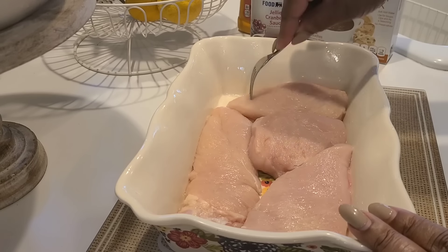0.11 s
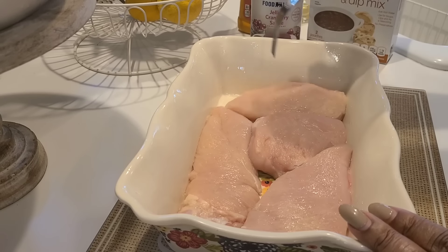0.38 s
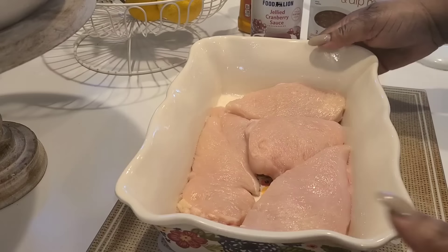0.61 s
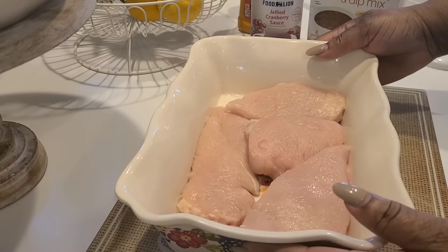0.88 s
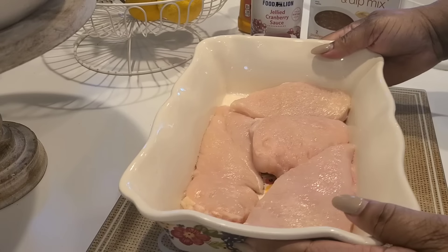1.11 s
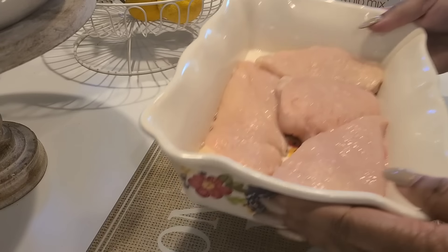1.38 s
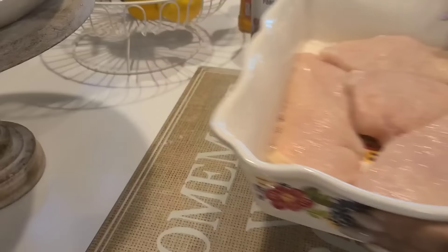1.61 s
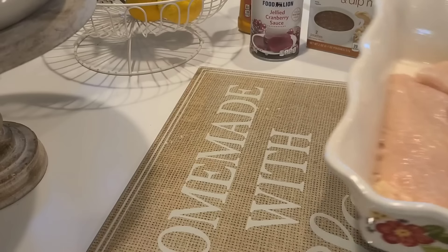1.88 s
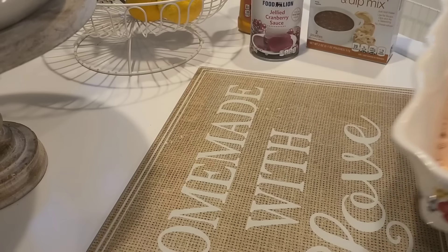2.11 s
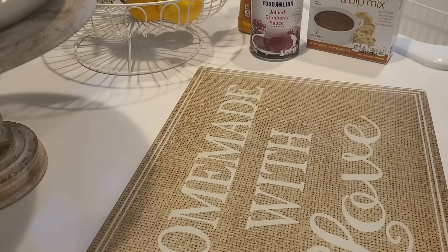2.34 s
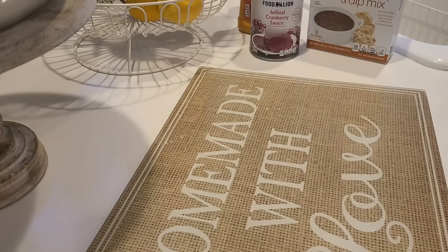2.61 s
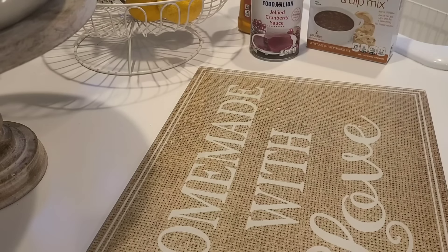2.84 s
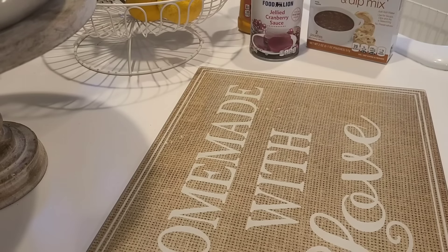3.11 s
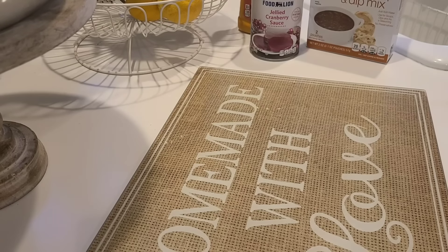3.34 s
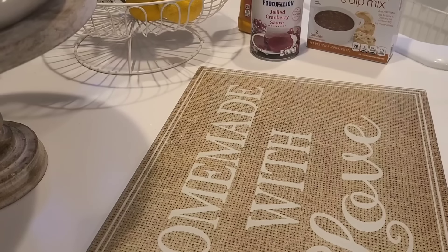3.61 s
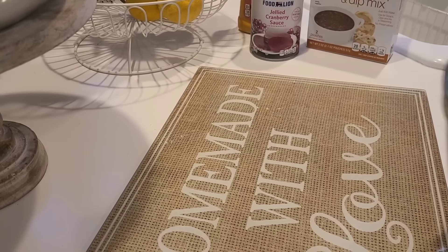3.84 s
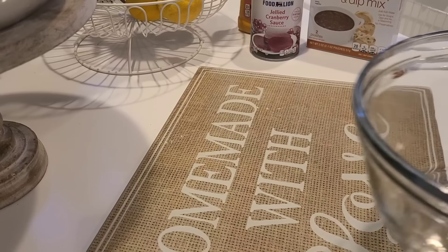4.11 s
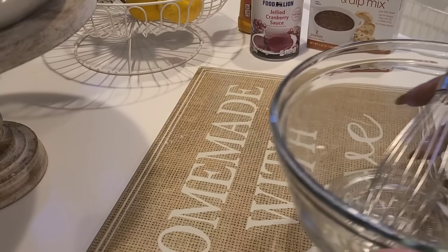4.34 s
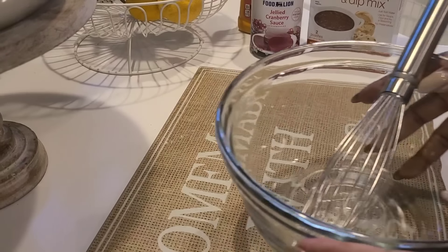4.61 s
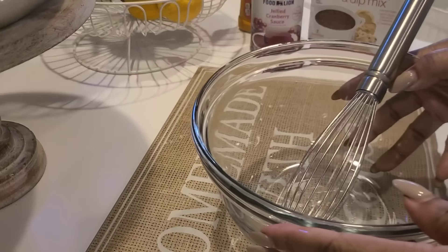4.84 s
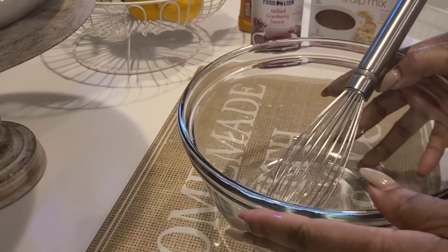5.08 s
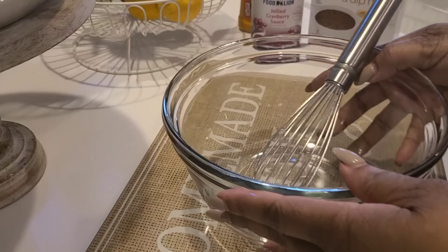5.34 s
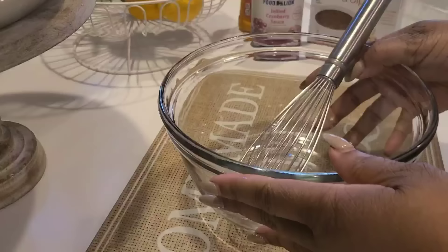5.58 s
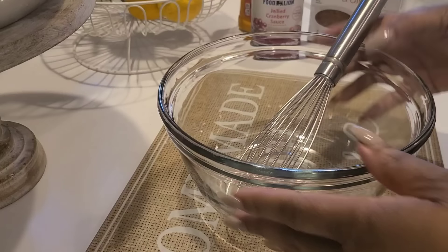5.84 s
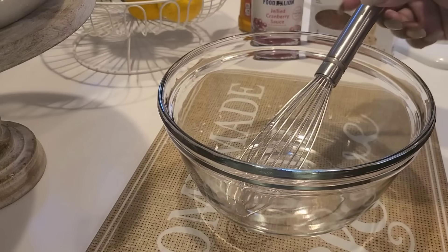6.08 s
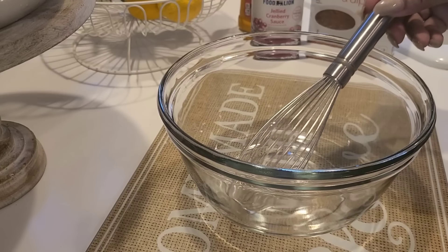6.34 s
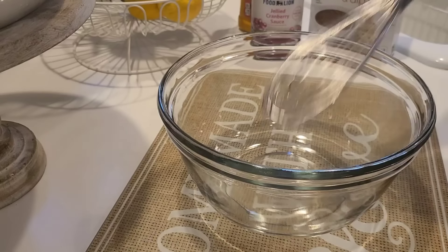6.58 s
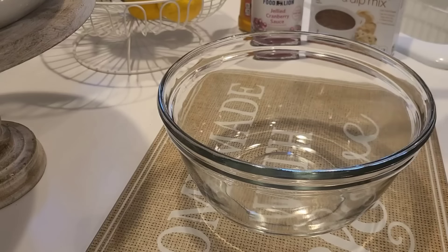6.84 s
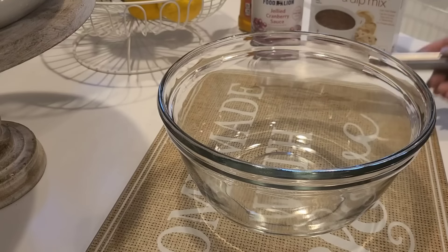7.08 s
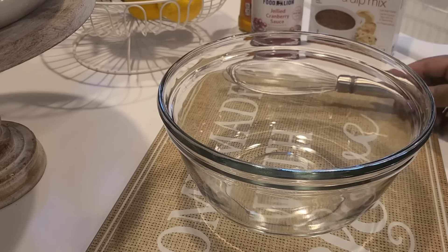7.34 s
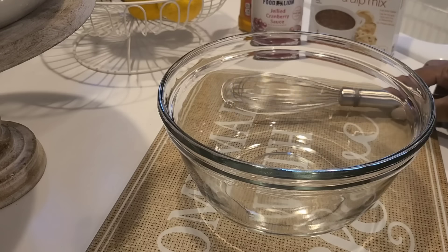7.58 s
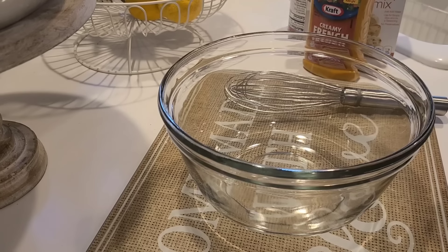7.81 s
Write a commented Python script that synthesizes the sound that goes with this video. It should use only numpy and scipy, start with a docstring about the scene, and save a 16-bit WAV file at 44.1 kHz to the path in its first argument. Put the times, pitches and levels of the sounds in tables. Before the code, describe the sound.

Close stereo kitchen sounds over a faint low hum and thin treble hiss: a cluster of ceramic knocks, an instant of dropout, tiny clinks, then mostly quiet. Small glassy taps and metal ticks lead to a heavy bowl set-down and a second abrupt knock, each with a short room tail. A softer glass tap follows, then whisk wires rattle on the counter in several bright bursts with one last hard clack.

```python
"""Knocks of a fork and a ceramic dish on a kitchen counter, taps on a glass bowl, then a clatter of whisk wires.
Shaped noise bursts make the knocks and low thumps; decaying tones make glass, dish and wires ring, and the
room answers with a noise tail. Steady tones and noise make a refrigerator hum; a treble hiss swells and fades.
The close sounds fall silent abruptly during two spans, and once everything drops out for an instant."""
import sys
import numpy as np
from scipy import signal
from scipy.fft import rfft, irfft, next_fast_len
from scipy.io import wavfile
from scipy.ndimage import uniform_filter1d, map_coordinates

SR = 44100
rng = np.random.default_rng(int(sys.argv[2]) if len(sys.argv) > 2 else 0)


def to_wav(s):
    """Save 16-bit WAV."""
    ch = np.atleast_2d(s).T  # columns
    pcm = np.round(np.clip(ch, -1, 1) * 32767)  # PCM
    wavfile.write(sys.argv[1], SR, pcm.astype(np.int16))


def volts(x):
    """Linear amplitude factor 10**(x/20) for a level x in dB, scalar or array-like."""
    e = np.asarray(x, float) / 20
    return 10 ** e


N = 350595  # length of the scene [samples]
SIZE = 16384  # longest single sound, before the room answers [samples]
# how alike the left and right noise are: (frequency [Hz], likeness [-1 to 1])
LIKENESS = [(60, 1), (180, 0.66), (550, 0.52), (1650, -0.087), (4970, -0.068), (15000, 0.81)]


def knocks():
    """Hard things meet: short bursts of contact noise ring the dish and the counter."""
    # knocks: (time [s], peak level [dB], hardness [dB per octave], ringing pitch [Hz])
    knock_list = [(0.004, -31.5, -1, 2170), (0.066, -31, 3.5, 2850), (0.282, -37, -0.5, 1500),
                  (0.289, -13, -1, 650), (0.293, -19, 0, 3050), (0.309, -13, -4.5, 2450),
                  (0.312, -14.5, -1.5, 1160), (0.433, -40.5, 5, 4370), (0.452, -41, 3, 4200),
                  (0.477, -58, 4, 2000), (0.791, -37.5, 13.5, 6100), (0.959, -31, 9, 4550),
                  (1.052, -43.5, 8.5, 6340), (1.21, -39, 8, 5040), (2.164, -23.5, 1.5, 2800),
                  (2.177, -20, 0.5, 3460), (3.082, -29, -7.5, 1550), (3.125, -39.5, -14.5, 970),
                  (3.47, -27, -7.5, 720), (3.495, -40.5, -8, 2000), (4.364, -34, 2, 1670),
                  (4.5, -34, 15.5, 6600), (5.096, -28, 2.5, 4000), (5.106, -1.5, 0, 1970),
                  (5.11, -6.5, 1, 4270), (5.118, -4.5, -0.5, 1040), (5.131, -11.5, -5.5, 634),
                  (5.144, -13.5, -1, 2000), (5.158, -14.5, -1, 1020), (5.176, -14, -2.5, 1144),
                  (5.198, -22.5, 0, 1970), (5.591, -35, 2.5, 3000), (5.6, -2.5, -1.5, 2040),
                  (5.639, -24.5, -5.5, 990), (5.864, -28, 7.5, 2270), (6.093, -41, -0.5, 2100),
                  (6.271, -20.5, 0, 2170), (6.301, -34.5, 0, 3600), (7.481, -13, 4.5, 4230),
                  (7.564, -27, -2.5, 630), (7.757, -19.5, 1.5, 660), (7.934, 0.5, 5, 1950)]
    # one brief drag: (from [s], to [s], level [dB], hardness [dB per octave]);
    # the silence at 3.536 s ends it sooner
    scuff = (3.5, 6.5, -54, 12)
    rise_s, soft_t60_s = 0.00027, 0.07  # the ring time is for hardness 0
    shorter_per_db = 0.1549  # hard knocks die sooner
    spike = 1.2  # strength of the first contact beside the noise
    out = np.zeros((2, N + SIZE))
    for s, db, hardness_db, ring_hz in knock_list:
        t60 = soft_t60_s * np.exp(-shorter_per_db * hardness_db)
        first_contact = spike * fading(0.0045, rise_s)
        contact = crunch() * fading(t60, rise_s) + first_contact
        spectra = stereo(contact, least_alike=0.35) * clack(hardness_db, ring_hz)
        add(out, s, volts(db) * peak(irfft(spectra)), left_db=-1.0)
    start, end, db, hardness_db = scuff
    held = np.arange(SIZE) < (end - start) * SR
    drag = irfft(stereo(held) * clack(hardness_db, 2170))
    add(out, start, volts(db) * drag / drag[:, held].std(), left_db=-1.2)
    return out


def crunch():
    """A knock is a cluster of tiny contacts: each gets its own random loudness."""
    spacing_s, spread_db = 0.002, 4.5
    step = round(spacing_s * SR)
    sizes = volts(spread_db * rng.standard_normal(SIZE // step + 1))
    return np.repeat(sizes, step)[:SIZE]


def clack(hardness_db, ring_hz):
    """The counter's colour, tilted by the hardness of the contact, with one ring and many small random ones."""
    # colour of dish and counter: (frequency [Hz], relative level [dB])
    colour = [(35, -48.5), (100, -19.5), (350, -8), (1150, -0.5), (2000, -3), (3600, -8), (4500, -13),
              (6400, -16.5), (9200, -29), (16000, -41)]
    hz = np.fft.rfftfreq(SIZE, 1 / SR)
    lumps_db = 3 * unit(uniform_filter1d(rng.standard_normal(len(hz)), size=170))
    ring_db = 6.5 / (1 + ((hz - ring_hz) / (.08 * ring_hz)) ** 2)
    tilt_db = hardness_db * np.log2((hz + 100) / 2000)
    return causal(along(colour, hz) + tilt_db + lumps_db + ring_db)


def whisk():
    """Each drop rings the main wires, three loud and free and the rest damped, many lesser ones and a clash."""
    # drops on the counter: (time [s], level [dB], three best struck pitches [Hz, Hz, Hz], rattle length [s])
    rattles = [(7.305, -4.5, 2794, 7990, 1290, 0.035), (7.345, -17, 2132, 4720, 895, 0.028),
               (7.357, -12.5, 3787, 6930, 2960, 0.0255), (7.564, -7.5, 5060, 3055, 2260, 0.052),
               (7.685, -18.5, 5505, 5930, 4457, 0.022), (7.709, -18.5, 3468, 4930, 1200, 0.05),
               (7.757, -7.5, 3787, 4457, 2500, 0.035), (7.78, -15.5, 2062, 1626, 5265, 0.041),
               (7.92, -15.5, 3787, 5930, 8100, 0.048)]
    # tones of the wires: (pitch [Hz], relative level [dB], ring time when free [s])
    wire_modes = [(745, -29, .3), (895, -24, .4), (975, -23, .4), (1200, -25, .3), (1290, -12, .08),
                  (1550, -17, .25), (1626, -14, .15), (2062, -13, .7), (2132, -13, .7), (2260, -8, .07),
                  (2500, -11, .07), (2794, -15, .55), (2960, -12, .15), (3055, -12, .22), (3468, -11, .12),
                  (3787, -12, .26), (4457, -11, .12), (4720, -13, .55), (4930, -13, .15), (5060, -8, .14),
                  (5265, -10, .13), (5505, -11, .15), (5930, -9, .15), (6170, -12, .2), (6490, -9, .13),
                  (6930, -7, .2), (7370, -8, .22), (7990, -12, .28), (8100, -9, .15), (8660, -11, .18),
                  (10870, -11, .12), (11950, -6, .14)]
    # colour of wire striking wire: (frequency [Hz], relative level [dB])
    clash_colour = [(240, -38), (550, -27), (1900, -14.5), (2840, -7.5), (4730, -7), (5110, -3),
                    (6540, -7.5), (14800, -12), (16000, -16)]
    damped = .28  # share of its ring time left to a wire that lands on the counter
    ring_db, jangle_db, clash_db = -3.0, -1.5, -13  # the mix of the three parts
    hz = np.fft.rfftfreq(SIZE, 1 / SR)
    out = np.zeros((2, N + SIZE))
    for s, db, *best_hz, length in rattles:
        favoured = lambda f: sum(favour(best, extra_db=11)(f) for best in best_hz)
        wires = np.array(wire_modes)
        wires[:, 2] *= np.where(favoured(wires[:, 0]) > 0, 1, damped)
        ring = struck(wires, favoured, length, scatter_db=1.5)
        # a new crowd of 120 lesser tones for every drop
        lesser_hz = 600 * 26 ** (rng.random(120) ** .7)
        lesser_t60 = 0.075 * (lesser_hz / 4000) ** -.1
        crowd = np.transpose([lesser_hz, along(clash_colour, lesser_hz), lesser_t60])
        jangle = struck(crowd, lambda f: 0, length, scatter_db=4.5)
        clash = irfft(stereo(fading(5 * length, 0.031)) * causal(along(clash_colour, hz)))
        clatter = volts(ring_db) * ring + volts(jangle_db) * jangle + volts(clash_db) * peak(clash)
        add(out, s - .002, volts(db) * clatter, left_db=-2.5)
    return out


def bowl():
    """Wires bounce softly on the glass and the handle ticks on the rim: few rings; knocks() cracks some taps."""
    # taps on the glass: (time [s], peak level [dB], best struck pitch [Hz], spread [octaves])
    taps = [(4.332, -45, 1430, 0.92), (4.357, -26.5, 1390, 1.06), (4.398, -28.5, 910, 0.54),
            (4.414, -32, 1480, 0.45), (4.47, -45, 895, 0.35), (4.497, -34, 5300, 0.47),
            (4.508, -36, 3200, 1), (4.58, -42, 1460, 0.57), (6.289, -26, 1930, 0.7),
            (6.34, -45.5, 2340, 0.2)]
    # tones of the glass: (pitch [Hz], relative level [dB], own ring time [s])
    glass = [(463, -3, .35), (915, -1, .11), (1435, -3, .12), (1890, -20, .08), (2395, -5, .14),
             (3620, 0, .09), (5120, -15, .04), (5850, -12, .05), (6200, -8, .04), (6420, -3, .05),
             (6560, 1, .07), (6720, -3, .05), (6880, -5, .09)]
    # handle on the rim: (time [s], peak level [dB], best struck pitch [Hz], left over right [dB])
    ticks = [(4.227, -33.5, 7090, -9.5), (4.816, -47, 3760, 2), (4.835, -46.5, 3760, -7),
             (4.856, -46, 3760, -14), (6.054, -44.5, 3760, -4.5), (6.152, -35, 3760, -2)]
    # tones of the handle: (pitch [Hz], relative level [dB], own ring time [s])
    handle = [(3760, -19, .06), (5830, -15, .05), (6870, -12, .04), (7090, -7, .04), (8820, -9, .06),
              (10090, -15, .04), (10900, -8, .07), (11900, -13, .05), (12950, -9, .06)]
    out = np.zeros((2, N + SIZE))
    # knocks() adds a small crack to some of the taps
    for s, db, hz, spread in taps:
        tap = struck(glass, near(hz, spread), length=.034, scatter_db=2)
        add(out, s - .002, volts(db) * tap, left_db=-1.5)
    for s, db, hz, left_db in ticks:
        tick = struck(handle, favour(hz, extra_db=19), length=.006, scatter_db=2.5)
        add(out, s - .001, volts(db) * tick, left_db)
    return out


def dish():
    """Fingernails clink on the ceramic: small hard touches ring it, mostly near the best struck pitch."""
    # touches: (time [s], peak level [dB], best struck pitch [Hz])
    clinks = [(1.209, -41, 5000), (1.224, -39.5, 3380), (1.28, -42, 1010)]
    # tones of the dish: (pitch [Hz], relative level [dB], own ring time [s])
    ceramic = [(1050, -10, .08), (1450, -16, .04), (2700, -5, .05), (3400, -4, .04), (4050, -10, .03),
               (5000, -6, .06), (7000, -8, .03)]
    out = np.zeros((2, N + SIZE))
    for s, db, hz in clinks:
        struck_db = lambda f: favour(hz, extra_db=6)(f) + near(hz, octaves=1)(f)
        clink = struck(ceramic, struck_db, length=.004, scatter_db=1.5)
        add(out, s - .001, volts(db) * clink, left_db=-1.5)
    return out


def thumps():
    """The counter top flexes at its lowest pitches: fading noise through two equal resonances builds up late."""
    # thumps: (time [s], peak level [dB], pitch [Hz])
    thump_list = [(0.009, -33, 74.5), (0.293, -28, 127), (0.32, -27, 85), (3.477, -40.5, 136),
                  (5.109, -27, 178), (5.136, -19.5, 151), (5.263, -31.5, 78.5), (5.601, -26, 98),
                  (5.641, -26, 82), (5.863, -41, 77.8), (6.093, -42, 95.7), (6.276, -36, 134),
                  (6.314, -33, 184), (7.307, -39.5, 400), (7.934, -28, 278)]
    out = np.zeros((2, N + SIZE))
    for s, db, hz in thump_list:
        push = rng.standard_normal(SIZE) * fading(t60=0.17, rise=0.0027)
        flex = filtered(push, lambda f: resonance(hz, .9 * hz)(f) ** 2)
        add(out, s - .004, volts(db) * peak(flex), left_db=-.6)
    return out


def kitchen(pair):
    """The room answers with fading noise; each third of a second meets a new tail."""
    # the room's ring time: (frequency [Hz], time to lose 60 dB [s])
    room = [(100, 0.38), (1000, 0.45), (3500, 0.43), (6000, 0.31), (12000, 0.4)]
    out = np.zeros_like(pair)
    step = SR // 3
    for start in range(0, N, step):
        hz, t, z = signal.stft(irfft(stereo(1)), SR, nperseg=256)
        decay = volts(-60 * t / along(room, hz)[:, None])
        tail = signal.istft(z * decay, SR, nperseg=256)[1]
        wet = signal.fftconvolve(pair[:, start:start + step], tail / np.linalg.norm(tail[0]), axes=1)
        late = start + round(0.004 * SR)  # the answer comes 4 ms later
        out[:, late:late + wet.shape[1]] += wet[:, :out.shape[1] - late]
    return out


def hiss():
    """A faint treble hiss: coloured noise whose level swells and fades."""
    # how loud the hiss is: (time [s], level [dB])
    swells = [(0, -58.5), (.3, -74.5), (0.548, -58.5), (1.2, -69.5), (1.7, -70), (2.3, -57), (2.55, -65),
              (2.95, -61.5), (3.15, -68.5), (3.6, -71.5), (4.27, -63), (5.3, -66), (5.58, -60.5),
              (6.0, -70), (6.35, -56.5), (6.651, -68), (7.3, -67.5)]
    # colour of the hiss: (frequency [Hz], relative level [dB])
    fizz = [(1290, -7.5), (2200, -7.5), (3070, -7), (3360, -11), (3500, -17), (7390, -4.5), (9100, -28),
            (10900, -22), (16000, -21)]
    s, db = np.transpose(swells)
    return volts(np.interp(np.arange(N) / SR, s, db)) * rush(fizz, patchy_db=1.5)


def refrigerator():
    """Compressor and fan tones, slightly unsteady in level and pitch, over the noise of the fan."""
    # steady tones: (pitch [Hz], average level [dB])
    hum = [(59.3, -57.5), (118.6, -73.5), (182, -65.5), (238, -64.5), (296, -69.5), (364, -55),
           (422, -69.5), (533, -73.5), (727, -72.5)]
    # colour of the fan noise: (frequency [Hz], relative level [dB])
    air = [(20, -23.5), (40, 4), (100, 0), (250, 3.5), (420, 2.5), (700, 0), (1000, -8.5), (1400, -9.5),
           (2300, -28.5), (4000, -21.5), (6000, -54)]
    air_db = -55.5
    t = np.arange(N) / SR
    tones = np.zeros(N)
    for hz, db in hum:
        swell_db = 1.5 * wobble(6)
        drift = hz / 300 * wobble(5) + 2 * np.pi * rng.random()  # wandering phase [radians]
        tones += volts(db + swell_db) * np.sqrt(2) * np.sin(2 * np.pi * hz * t + drift)
    fan = volts(air_db) * rush(air, patchy_db=2.25)
    return tones * volts([[-1.2], [1.2]]) + volts([[-.9], [.9]]) * fan


def rush(spectrum, patchy_db):
    """Stereo noise of average strength 1, coloured by spectrum, with patches of random gain."""
    z = signal.stft(rng.standard_normal((2, N)), nperseg=512)[2]
    across_pitch = uniform_filter1d(rng.standard_normal(z.shape[1:]), 6, 0)
    field = uniform_filter1d(across_pitch, 14, 1)  # smoothed over time too
    pair = signal.istft(z * volts(patchy_db * unit(field)), nperseg=512)[1][:, :N]
    turn = lambda hz: np.arccos(np.clip(along(LIKENESS, hz), -1, 1)) / 2
    colour = lambda hz: volts(along(spectrum, hz)) * [np.cos(turn(hz)), np.sin(turn(hz))]
    mid, side = filtered(pair, colour)
    return unit(np.array([mid + side, mid - side]))


def stereo(shape, least_alike=-1):
    """Spectra of shaped noise at two microphones, as alike as LIKENESS says but never below least_alike."""
    hz = np.fft.rfftfreq(SIZE, 1 / SR)
    turn = np.arccos(np.clip(along(LIKENESS, hz), least_alike, 1)) / 2
    a, b = rfft(rng.standard_normal((2, SIZE)) * shape)
    mid, side = np.cos(turn) * a, np.sin(turn) * b
    return np.array([mid + side, mid - side])


def struck(modes, struck_db, length, scatter_db):
    """Small contacts build a ring up over about length seconds; an extra fade takes 60 dB a second."""
    return peak(ringing(modes, struck_db, scatter_db) * fading(1.0, length / 3))


def ringing(modes, struck_db, scatter_db):
    """Each tone beats like a close group, at a new strength, with its own phase at each microphone."""
    hz, db, t60 = np.transpose(modes)[..., None]
    t = np.arange(min(SIZE, round(.7 * t60.max() * SR))) / SR
    db = db + struck_db(hz) + scatter_db * rng.standard_normal(hz.shape)
    turn = 2 * np.pi * rng.random((2, *hz.shape))
    beat_hz = rng.uniform(8, 30, hz.shape)
    beat = 1 + .5 * np.cos(2 * np.pi * beat_hz * t + turn)
    ring = np.sum(volts(db - 60 * t / t60) * beat * np.sin(2 * np.pi * hz * t + turn), 1)
    return np.pad(ring, ((0, 0), (0, SIZE - len(t))))


def near(best_hz, octaves):
    """dB lost away from the best struck pitch."""
    return lambda hz: -6 * (np.log2(hz / best_hz) / octaves) ** 2


def favour(best_hz, extra_db):
    """dB gained by the one tone struck at its liveliest spot: the nearest to best_hz."""
    return lambda hz: extra_db * (np.abs(hz - best_hz) == np.abs(hz - best_hz).min())


def fading(t60, rise):
    """An envelope that rises with time constant rise [s] while it loses 60 dB in t60 [s], at least 4 ms."""
    t = np.arange(SIZE) / SR
    return volts(-60 * t / max(t60, .004)) * (1 - np.exp(-t / rise))


def resonance(centre_hz, width_hz):
    """One resonance that rings only after the push, gain 1 at its centre."""
    return lambda f: 1j * f * width_hz / (centre_hz ** 2 - f * f + 1j * f * width_hz)


def causal(db):
    """The minimum-phase response with these gains: nothing sounds before the blow."""
    c = irfft(db * np.log(10) / 20)
    c[1:len(c) // 2] *= 2
    c[len(c) // 2 + 1:] = 0
    return np.exp(rfft(c))


def filtered(x, response):
    """x times a complex response of frequency."""
    n = x.shape[-1]
    m = next_fast_len(n + SIZE)
    return irfft(rfft(x, m) * response(np.fft.rfftfreq(m, 1 / SR)), m)[..., :n]


def along(points, hz):
    """Reads a curve of (frequency [Hz], value) points on a log frequency axis."""
    f, v = np.transpose(points)
    return np.interp(np.log(hz + 1), np.log(f + 1), v)


def wobble(rate):
    """A smooth random curve through rate random points a second."""
    knots = rng.standard_normal(int(N * rate / SR) + 4)
    return map_coordinates(knots, [np.arange(N) * rate / SR])


def unit(x):
    """Scales x to an average (rms) strength of 1."""
    return x / np.sqrt(np.mean(x ** 2) + 1e-20)


def peak(x):
    """Scales x so that its highest point is 1."""
    return x / np.abs(x).max()


def add(pair, s, sound, left_db):
    """Puts a stereo sound at its moment, the left side left_db louder against the right."""
    balance = volts([[left_db / 2], [-left_db / 2]])
    pair[:, round(max(s, 0) * SR):][:, :SIZE] += balance * sound


def scene():
    """Adds the close sounds and the room's answer, silences two spans of them, then adds the background."""
    # abrupt silences that end the tails of knocks: (from [s], to [s])
    silences = [(.5402, .78), (3.536, 4.1)]
    hard = knocks()
    rings = dish() + bowl() + whisk()
    echo = kitchen(volts(-9.0) * hard + volts(-13) * rings)
    close = hard + rings + thumps() + echo
    for start, end in silences:
        close[:, round(start * SR):round(end * SR)] = 0
    return close[:, :N] + refrigerator() + hiss()


def low_pass(x):
    """Removes everything above the highest recorded frequency."""
    return signal.sosfilt(signal.butter(12, 16660, fs=SR, output="sos"), x)


def record(dry):
    """Nothing above the top frequency passes, and the sound drops out once for an instant."""
    # the dropout: (from [s], to [s])
    dropout = (.5402, .5703)
    top_hz = 16100
    t = np.arange(N) / SR
    silent = (t > dropout[0]) & (t < dropout[1])
    limited = filtered(dry, lambda hz: hz < top_hz)
    mix = limited * np.where(silent, volts(-69), 1)
    return low_pass(mix)


dry = scene()
out = record(dry)
to_wav(out)
```